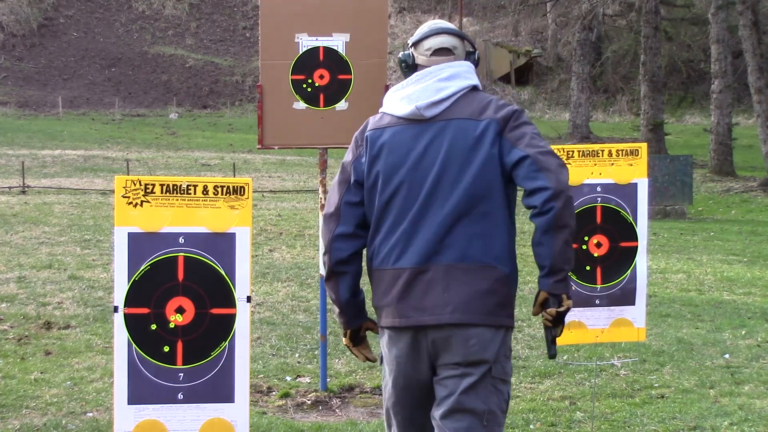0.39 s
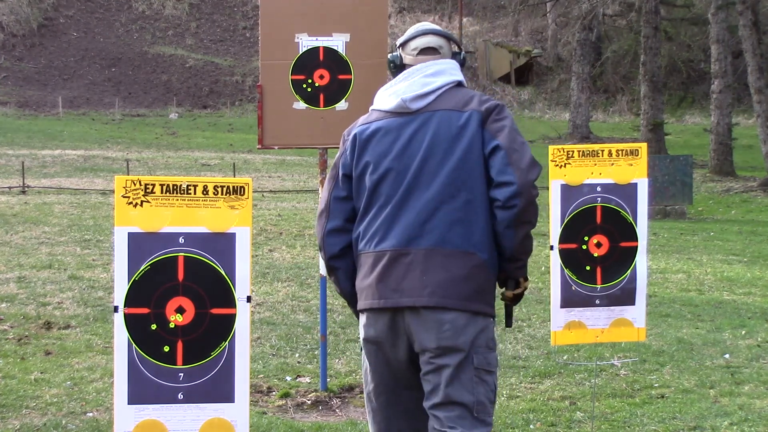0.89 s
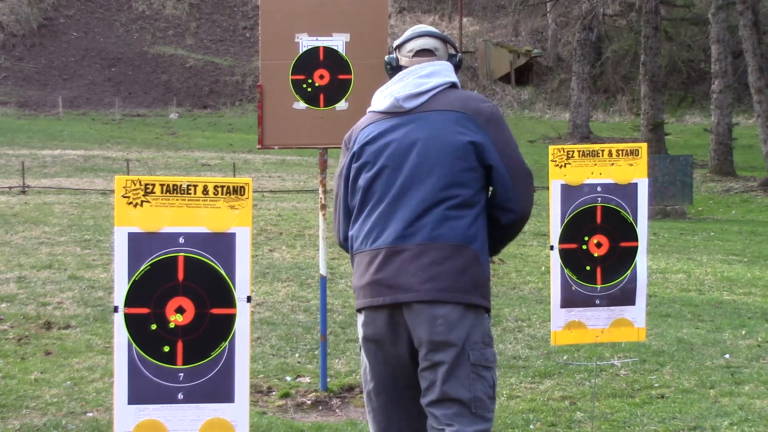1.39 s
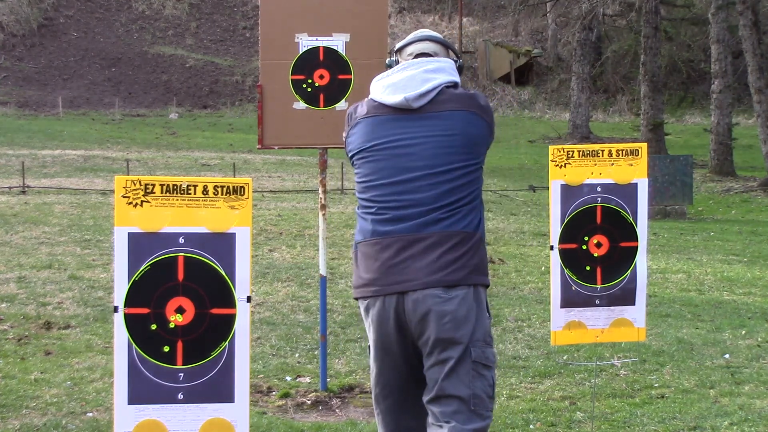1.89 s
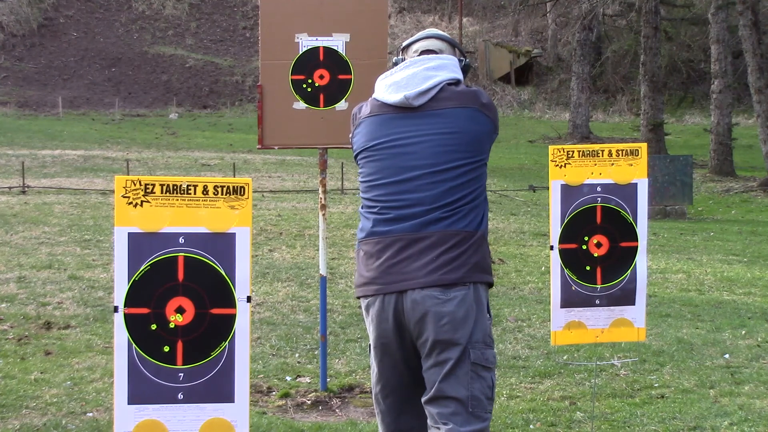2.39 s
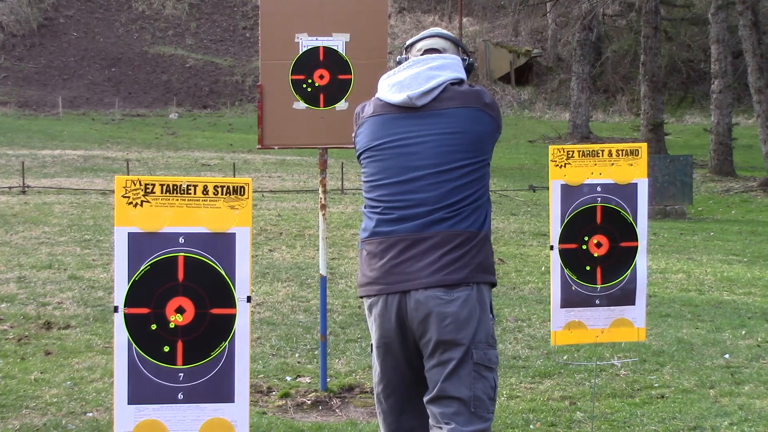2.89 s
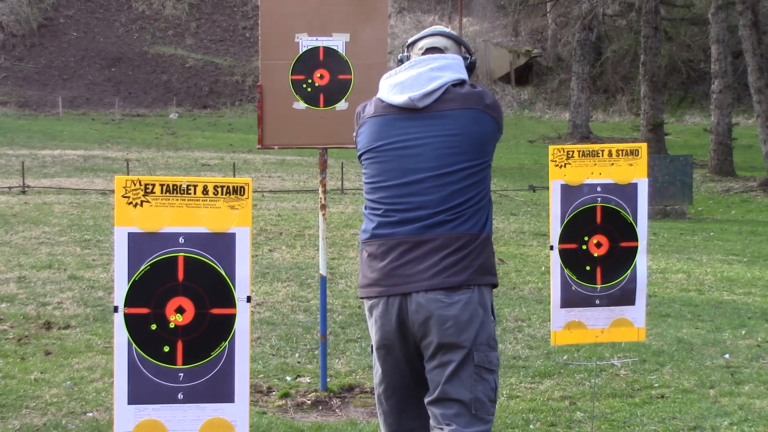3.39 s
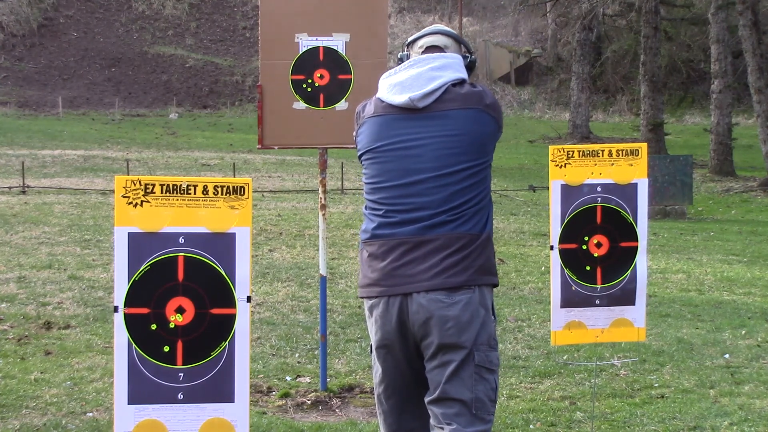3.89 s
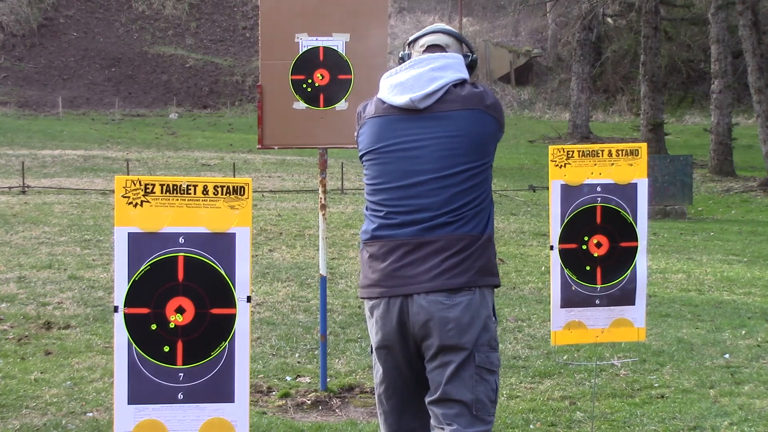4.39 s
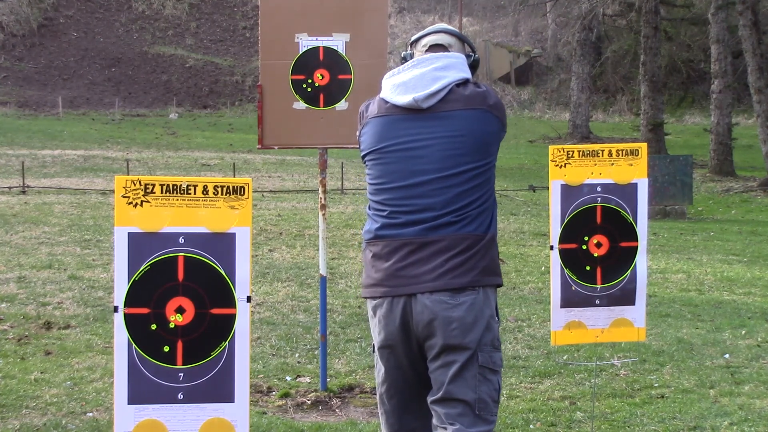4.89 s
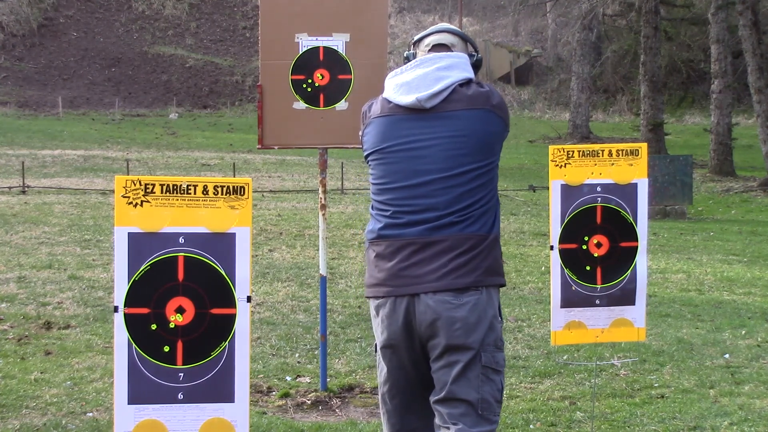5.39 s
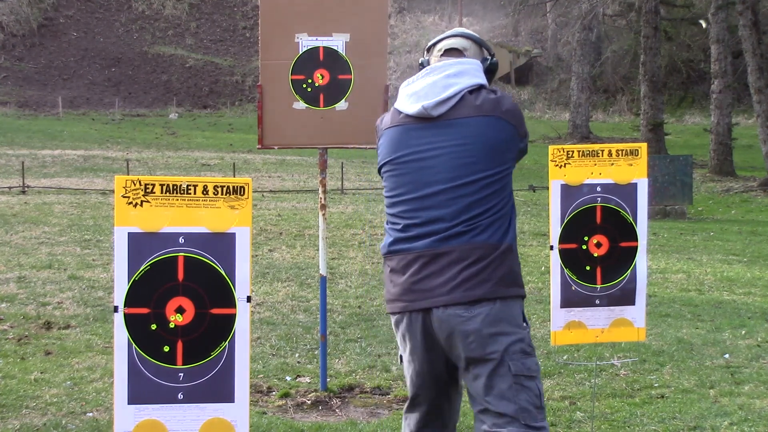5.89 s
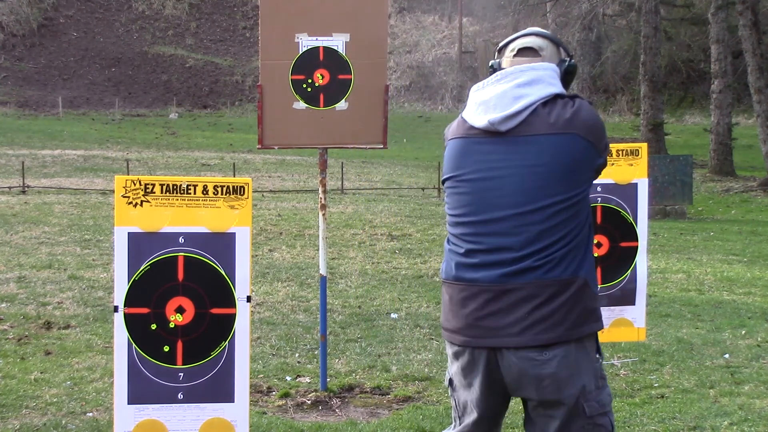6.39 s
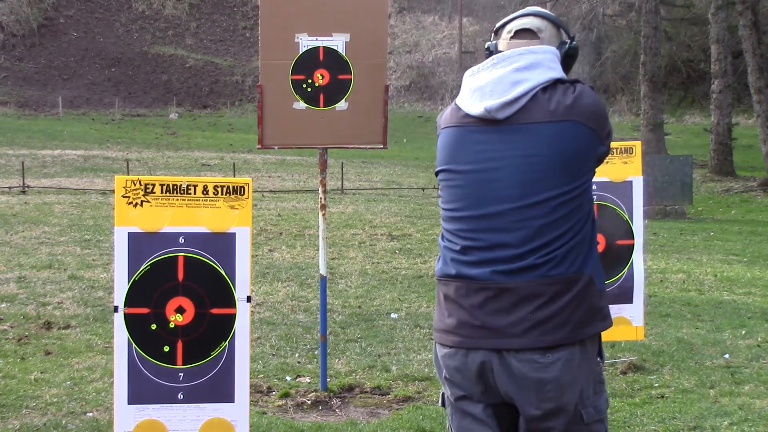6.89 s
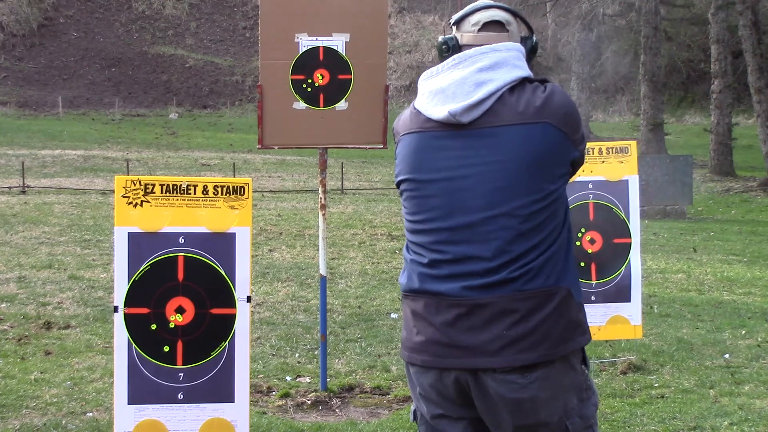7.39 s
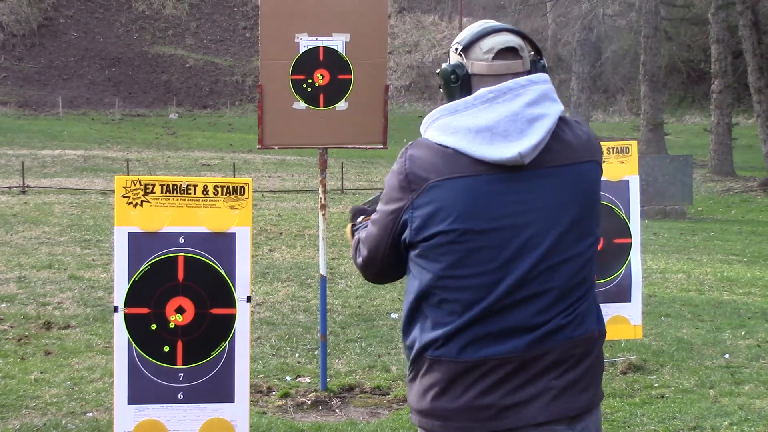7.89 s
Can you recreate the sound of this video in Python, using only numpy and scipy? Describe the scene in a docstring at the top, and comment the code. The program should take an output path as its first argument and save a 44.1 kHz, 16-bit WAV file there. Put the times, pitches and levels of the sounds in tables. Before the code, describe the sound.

A quiet grassy range opens with soft far traffic, short bird whistles, a faint high whine, jacket rustle and a small metallic safety click. After about three seconds, five loud pistol shots arrive at uneven spacing, the last pair closest together. Each cracks hard, slaps off a target board and rolls back from trees. Spent cases tick after the first three. The microphone sits behind the shooter, overloads, and the background sinks away.

```python
"""Five pistol shots on a grassy range

Heard from behind the shooter: each blast is a pressure jolt with short rings and gas noise, then near copies,
a slap off the target board, and noise echoes rolling back from trees and hills, duller with distance.
Before them: shaped noise for far traffic and jacket cloth, sliding tones for birds, a safety catch, thin hisses
and a faint whine. The camera's gain control sinks these once the first blast arrives."""
import sys
import numpy as np
from scipy import signal
from scipy.fft import rfft, irfft, next_fast_len
from scipy.io import wavfile
from scipy.ndimage import uniform_filter1d, minimum_filter1d

SR = 44100
rng = np.random.default_rng(int(sys.argv[2]) if len(sys.argv) > 2 else 0)


def to_wav(sig):
    """Store sig (one row per channel, or 1-D mono) as 16-bit WAV at the path in sys.argv[1].

    Samples outside -1..1 are clipped; the rate is SR.
    """
    pcm = np.clip(np.atleast_2d(sig), -1, 1) * 32767
    pcm = np.round(pcm).astype(np.int16)
    wavfile.write(sys.argv[1], SR, pcm.T)  # frames by channels


def makeup_ratio(level_db):
    """Linear amplitude ratio for a level in decibels (20 dB per factor of ten)."""
    decades = np.asarray(level_db, float) / 20
    return 10 ** decades


N = 353241  # length in samples

# The shots. Each row: start in seconds, blast level in dB, first-instant surge in dB, board slap in dB
# before that blast level, low cut in Hz.
SHOT_ROWS = [(3.0531, -2, 14, -4, 300), (4.0656, 0.5, 4.5, 2, 360), (5.4851, -4, 6.5, 0, 207),
             (6.567, 0, 2, 1, 473.4), (7.1259, -2.5, 3, -3.5, 574)]
# Echo levels after each shot. Each row: near, middle and far echo in dB, bass in dB, treble in dB.
ECHO_LEVELS = [(10, 6.5, 8.5, 6.5, -6.5), (0, -11, 4.5, -4.5, 0), (1, -4, 0, -1.5, 0.5),
               (0.5, -12.5, -3, -21, 0), (-5.5, -13.5, 2, -19, 1.5)]
# Colour of the roll before distance dulls it. Each row: frequency in Hz, relative level in dB per Hz.
FRESH_COLOUR = [(29, -69.5), (50, -36), (230, -12), (500, -3.5), (746, -1), (900, -4), (1500, -7.5),
                (3200, -13), (10600, -24), (16000, -42.5)]
# Width of the open field. Each row: frequency in Hz, side over centre in dB.
FIELD_WIDTH = [(60, -21), (180, -18.5), (550, -19), (1650, -15.5), (4970, -13.5), (15000, -21.5)]


def unit(x):
    """Scale to an rms of one."""
    return x / np.sqrt(np.mean(x ** 2) + 1e-20)


def along(points, hz):
    """Read rows of frequency and value on a log frequency axis."""
    f, v = np.transpose(points)
    return np.interp(np.log(hz + 1), np.log(f + 1), v)


def curve(rows, t):
    """Read rows of seconds and value at times t."""
    return np.interp(t, *np.transpose(rows))


def filtered(x, response):
    """Multiply the spectrum of x by a response that is a function of frequency."""
    n = x.shape[-1]
    m = next_fast_len(n + 8192)
    return irfft(rfft(x, m) * response(np.fft.rfftfreq(m, 1 / SR)), m)[..., :n]


def band(lo_hz, hi_hz):
    """Causal band-pass, two poles each side."""
    return lambda f: (1j * f / (lo_hz + 1j * f) * hi_hz / (hi_hz + 1j * f)) ** 2


def stereo(mid, side, side_db):
    """Left and right from a centre and a side signal coloured by side_db."""
    side = filtered(side, lambda hz: makeup_ratio(along(side_db, hz)))
    return np.array([mid + side, mid - side])


def add(out, x, s):
    """Mix x into out from time s."""
    part = out[..., round(s * SR):][..., :x.shape[-1]]
    part += x[..., :part.shape[-1]]


def traffic():
    """A far road: a smooth rush of noise with gentle patches in time and frequency."""
    # Each row: frequency in Hz, relative level in dB.
    colour = [(12, -58.5), (25, -21.5), (86, -0.5), (250, -1), (480, -4.5), (640, -2), (810, 2), (1000, -3),
              (1760, -12), (2670, -19.5), (4400, -26), (6180, -29.5), (11100, -35.5), (16000, -47)]
    z = signal.stft(rng.standard_normal((2, N)), nperseg=512)[2]
    patches = uniform_filter1d(rng.standard_normal(z.shape[1:]), size=5, axis=0)
    patches = uniform_filter1d(patches, size=12, axis=1)
    pair = signal.istft(z * makeup_ratio(0.4 * unit(patches)), nperseg=512)[1][:, :N]
    pair = unit(filtered(pair, lambda hz: makeup_ratio(along(colour, hz))))
    return stereo(*pair, FIELD_WIDTH) * makeup_ratio(-45.5)


def whine():
    """A faint high tone, on in short stretches drawn at random."""
    on = np.repeat(rng.random(N // 1024 + 1) < .55, 1024)[:N]
    tone = np.sin(2 * np.pi * 5600 * np.arange(N) / SR)
    return makeup_ratio(-69) * uniform_filter1d(on * 1., size=300) * tone


def shooter():
    """Jacket cloth rubs, as uneven noise, while the arms rise; the safety catch clicks as a noise burst."""
    # Jacket rubs. Each row: start in seconds, end in seconds, first level in dB, last level in dB.
    rubs = [(0, 0.144, -57.5, -71), (1.175, 1.438, -56.5, -47), (1.443, 1.516, -50, -56.5),
            (1.515, 2.2, -58, -72.5)]
    # Colour of the cloth. Each row: frequency in Hz, relative level in dB per Hz.
    cloth_colour = [(1200, -5.5), (2500, 4), (5000, -3.5), (7000, 1), (11000, -5), (15500, -12.5)]
    # Safety catch. Each row: start in seconds, onset level in dB.
    clicks = [(0.9055, -32.5)]
    t = np.arange(N) / SR
    unevenness = 1.7 * unit(uniform_filter1d(rng.standard_normal(N), size=90))  # dB
    fibres = rng.standard_normal((2, N)) * makeup_ratio(unevenness)
    cloth = unit(filtered(fibres, lambda hz: makeup_ratio(along(cloth_colour, hz))))
    level = np.zeros(N)
    for s, end, first_db, last_db in rubs:
        level += makeup_ratio(np.interp(t, [s, end], [first_db, last_db])) * (t >= s) * (t < end)
    out = cloth * level
    for s, db in clicks:
        click = unit(filtered(rng.standard_normal((2, 900)), band(2500, 9000)))
        add(out, click * makeup_ratio(db - 60 * t[:900] / .016), s)
    return stereo(*out, FIELD_WIDTH)


def note(length, first_hz, last_hz, db):
    """A sliding whistle with soft ends."""
    u = np.linspace(0, 1, round(length * SR))
    phase = 2 * np.pi * np.cumsum(first_hz + (last_hz - first_hz) * u) / SR
    return makeup_ratio(db) * np.sqrt(2) * np.sin(np.pi * u) * np.sin(phase)


def birds():
    """Whistles and a far trill, blurred by the trees: a decaying noise tail follows each note."""
    # Each row: start in seconds, length in seconds, first pitch in Hz, last pitch in Hz, level in dB.
    notes = [(0.297, 0.063, 2130, 2030, -55.5), (0.349, 0.018, 3060, 2520, -50),
             (.37, 0.027, 2100, 2250, -52), (0.494, .03, 3700, 4340, -63), (0.544, 0.034, 2190, 2250, -59),
             (0.917, 0.079, 2664, 2770, -47), (0.954, 0.059, 2770, 2393, -47.5),
             (1.006, 0.053, 2480, 2550, -59), (1.091, 0.062, 3250, 2920, -59.5),
             (1.412, 0.048, 3420, 3610, -54), (1.448, 0.046, 2656, 2760, -46),
             (1.544, 0.03, 3650, 3590, -57.5), (1.546, 0.041, 3370, 2680, -59),
             (1.665, 0.048, 2630, 2420, -50.5), (2.094, 0.07, 1975, 2093, -53.5),
             (2.143, 0.02, 3120, 2580, -49.5), (2.175, 0.066, 2290, 2265, -55),
             (2.25, 0.14, 1950, 2230, -61), (2.287, 0.02, 3020, 2520, -55.5),
             (2.767, 0.067, 2670, 3040, -46), (2.88, 0.025, 2760, 3050, -46),
             (2.93, 0.032, 3280, 3170, -60), (2.93, 0.13, 2110, 2330, -61), (0.346, 0.026, 4200, 3300, -67),
             (0.504, 0.033, 2890, 2350, -58), (0.706, .03, 3770, 4200, -66), (1.05, 0.026, 3900, 3400, -64),
             (1.9, 0.024, 6800, 7600, -65), (2.83, 0.013, 2510, 2360, -51)]
    # One trill: start in seconds, spacing in seconds, first pitch in Hz, last pitch in Hz, mean level in dB.
    trill = (1.925, .0745, 4400, 3950, -63)
    plain = np.zeros(N)
    for s, *shape in notes:
        add(plain, note(*shape), s)
    start, spacing, *shape = trill
    for k in range(11):
        add(plain, note(0.021, *shape) * makeup_ratio(rng.normal(0, 1.5)), start + k * spacing)
    t = np.arange(SR // 2) / SR
    tails = rng.standard_normal((2, len(t))) * makeup_ratio(-60 * t / .9)
    tails = tails / np.linalg.norm(tails[0])
    blurred = makeup_ratio(-4) * signal.fftconvolve(plain[None], tails, axes=1)[:, :N]
    return stereo(plain + blurred[0], blurred[1], FIELD_WIDTH)


def hisses():
    """Brief narrow bands of noise near 7 kHz with abrupt ends."""
    # Each row: start in seconds, length in seconds, level in dB.
    bursts = [(1.168, 0.025, -58), (2.983, 0.07, -59.5)]
    out = np.zeros(N)
    for s, length, db in bursts:
        noise = rng.standard_normal(round(length * SR))
        noise = filtered(noise, lambda f: 1 / (1 + ((f - 6900) / 650) ** 6))
        add(out, makeup_ratio(db) * unit(noise), s)
    return out


def blast(bright_db):
    """A pressure jolt that rings briefly, with a spit of gas noise; centre and side."""
    # Ringing as the blast bends round the shooter. Each row: frequency in Hz, mean relative level in dB,
    # time to fall 60 dB in seconds.
    modes = [(220, -9.5, 0.0049), (365, -5, 0.03), (630, -4, 0.0068), (1020, -9.5, 0.0074),
             (1200, -12, 0.0058), (1895, -15, 0.0077), (2960, -14.5, .004)]
    t = np.arange(SR // 20) / SR
    jolt = -(1 - t / .0001) * np.exp(-t / .0001)
    ring = np.zeros(len(t))
    for hz, db, t60 in modes:
        ring += makeup_ratio(db + rng.normal(0, 1) - 60 * t / t60) * np.sin(2 * np.pi * hz * t)
    spit = filtered(rng.standard_normal((2, len(t))), band(2000, 12000)) * makeup_ratio(bright_db - 60 * t / .02)
    swell = 1 - np.exp(-t / .0002)  # the body shields the sharpest edge
    return 0.61 * jolt + swell * ring + spit


def echo_db(levels_db, age):
    """The echo level after a shot at an age, between its near, middle and far values."""
    return np.interp(age, [.04, .3, .85], levels_db)  # ages in s


def roll(length, levels_db, bass_db, treble_db):
    """Countless tree echoes: noise whose colour darkens with the path it has travelled."""
    # A tree line swells the echo after a quarter second. Each row: age in seconds,
    # level of 300-1200 Hz in dB before the ground ripple and the shot's own echo levels.
    decay = [(.009, -13), (.015, -21.5), (.026, -24), (.04, -24), (.09, -31.5), (.14, -38), (.238, -41.5),
             (.275, -37), (.42, -44), (.6, -54), (.95, -61.5), (1.3, -69.5)]
    # What the way takes from each band. Each row: frequency in Hz, relative loss in dB per second.
    losses = [(29, 51), (50, 50), (230, 29), (400, -5.5), (700, 1.5), (1400, 5), (2500, 10), (3500, 17),
              (5000, 30), (10600, 63.5), (16000, 68)]
    # Grass bounce ripples the roll. Each row: frequency in Hz, change in dB.
    ripple = [(1000, 1.5), (1400, -3.5), (1830, 2), (2300, -1), (2950, 3.5), (3700, 1)]
    t = np.arange(round(length * SR)) / SR
    hz, age, z = signal.stft(rng.standard_normal((2, len(t))), SR, nperseg=512)
    row_hz = hz[:, None]
    travelled = np.where(row_hz < 500, np.minimum(age, 1), age)  # the bass stops losing at 1 s
    colour = along(FRESH_COLOUR, row_hz) - along(losses, row_hz) * travelled
    # hold the middle band level, so that the decay table alone sets its fall
    colour -= 10 * np.log10(np.mean(makeup_ratio(2 * colour[(hz > 300) & (hz < 1200)]), axis=0))
    colour += along(ripple, row_hz)
    colour += bass_db / (1 + (row_hz / 250) ** 2)
    colour += treble_db / (1 + (3000 / (row_hz + 1)) ** 2)
    noise = signal.istft(z * makeup_ratio(colour), SR, nperseg=512)[1][:, :len(t)]
    noise = noise * np.sqrt(SR / 2 / 900)  # the middle band is 900 Hz wide
    onset_and_end = (1 - np.exp(-(t / .008) ** 2)) * np.clip((t[-1] - t) / .01, 0, 1)
    # trunks answer in faint clumps (dB)
    lumps = .9 * unit(uniform_filter1d(rng.standard_normal(len(t)), size=400))
    return noise * makeup_ratio(curve(decay, t) + echo_db(levels_db, t) + lumps) * onset_and_end


def reflections():
    """Single far reflectors send the first three blasts back as smeared, dulled claps of noise."""
    # Reflectors facing the first firing spot. Each row: delay in seconds, peak level in dB before the
    # shot's own echo levels, low cut in Hz, top in Hz.
    reflectors = [(.2455, -26, 250, 4500), (.3675, -29, 250, 1200), (.482, -33, 250, 3000),
                  (.882, -43, 300, 3600)]
    out, t = np.zeros((2, N)), np.arange(900) / SR
    for (s, *_), levels in zip(SHOT_ROWS[:3], ECHO_LEVELS):  # three shots come from that spot
        for delay, db, low_hz, top_hz in reflectors:
            smear = rng.standard_normal((2, len(t))) * makeup_ratio(-60 * t / .05) * np.minimum(t / .001, 1)
            # the roll's fresh colour, tilted by about -3 dB per octave
            clap = filtered(smear, lambda f: makeup_ratio(along(FRESH_COLOUR, f) - 3 * np.log2(f / 1000 + .4)))
            clap = filtered(clap, lambda f: band(low_hz, 9000)(f) / (1 + (f / top_hz) ** 8))
            level = makeup_ratio(db + echo_db(levels[:3], delay))
            add(out, level * clap / np.abs(clap[0]).max(), s + delay)
    return out


def spent_cases():
    """A spent case ticks as it lands after each of the first three shots: a very short treble noise burst."""
    # Each row: start in seconds, peak level in dB.
    ticks = [(3.3427, -28.5), (4.3445, -39), (5.7653, -36)]
    out, t = np.zeros((2, N)), np.arange(900) / SR
    for s, db in ticks:
        burst = rng.standard_normal((2, len(t))) * makeup_ratio(-60 * t / .012)
        tick = filtered(burst, lambda f: band(5000, 40000)(f) / (1 + (f / 12500) ** 10))
        add(out, makeup_ratio(db) * tick / np.abs(tick).max(), s)
    return out


def pistol():
    """Each shot: blast and near copies, low thump, board slap with its ground bounce, roll;
    far claps and case ticks after the first three."""
    # Near surfaces, the direct blast first. Each row: delay in seconds, relative level in dB, top in Hz.
    near_surfaces = [(0, 0, 20000), (.0023, 0, 14000), (.0062, -5, 5000), (.0088, -3, 4000),
                     (.0112, -7, 4000)]
    # Low push under each blast: frequency in Hz, relative level in dB, time to fall 60 dB in seconds.
    thump = (240, -10, .06)
    # Delay of the board slap for each shot in seconds, longer once the shooter has stepped aside.
    slap_delays = [.0164, .0161, .0163, .0209, .0228]
    # Width of the blast. Each row: frequency in Hz, side over centre in dB.
    blast_width = [(60, -16.5), (180, -38.5), (550, -28), (1650, -25), (4970, -24), (15000, -20)]
    # Width of the echoes. Each row: frequency in Hz, side over centre in dB.
    roll_width = [(60, -23), (180, -43), (550, -31.5), (1650, -22), (4970, -12), (15000, -12)]
    far, near = reflections() + spent_cases(), np.zeros((2, N))
    t = np.arange(SR // 8) / SR
    thump_hz, thump_db, thump_t60 = thump
    ends = [row[0] for row in SHOT_ROWS[1:]] + [N / SR + 1]  # each roll stops at the next shot
    for shot, slap_s, levels, end in zip(SHOT_ROWS, slap_delays, ECHO_LEVELS, ends):
        s, db, surge_db, slap_db, cut_hz = shot
        *levels_db, bass_db, treble_db = levels
        direct, close = blast(bright_db=-8.5), np.zeros((2, len(t)))
        for delay, near_db, top_hz in near_surfaces:
            add(close, makeup_ratio(near_db) * filtered(direct, band(20, top_hz)), delay)
        close += makeup_ratio(thump_db - 60 * t / thump_t60) * np.sin(2 * np.pi * thump_hz * t)
        close *= makeup_ratio(surge_db * np.exp(-(t / .006) ** 2))
        slap = makeup_ratio(slap_db) * filtered(blast(bright_db=-4.5), band(340, 12000))
        add(close, slap, slap_s)
        add(close, slap, slap_s + 0.0017)  # the slap once more, off the ground
        add(near, makeup_ratio(db) * filtered(close, band(cut_hz, 20000)), s)
        add(far, roll(end - s, levels_db, bass_db, treble_db), s)
    return stereo(*near, blast_width) + stereo(*far, roll_width)


def gain_control(loud, depth_db, recover_db_per_s):
    """Gain for the quiet sounds: drops just ahead of any loud peak, then creeps back."""
    n = np.arange(N)
    last_loud = np.maximum.accumulate(np.where(np.abs(loud).max(0) > .25, n, -10 * N))
    gain_db = np.minimum(0, recover_db_per_s * (n - last_loud) / SR - depth_db)
    return makeup_ratio(uniform_filter1d(minimum_filter1d(gain_db, size=1100), size=100))


def scene():
    """The shots over the field; this gain curve multiplies the field alone."""
    field = traffic() + whine() + shooter() + birds() + hisses()
    shots = pistol()
    return shots + field * gain_control(shots, depth_db=55, recover_db_per_s=2)


def roll_off(x):
    """The treble ends steeply here."""
    return signal.sosfilt(signal.butter(12, 16540, fs=SR, output="sos"), x)


def record(dry):
    """The microphone drops the deepest bass and the converter clips, slightly rounded, at full scale."""
    mic = filtered(dry, band(63, 27000))
    clipped = mic / (1 + np.abs(mic) ** 12) ** (1 / 12)
    return roll_off(clipped)


dry = scene()
out = record(dry)
to_wav(out)
```